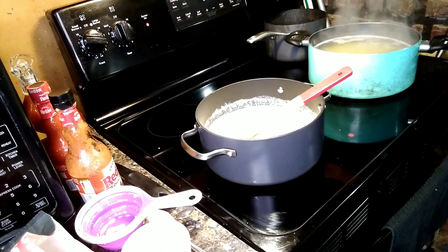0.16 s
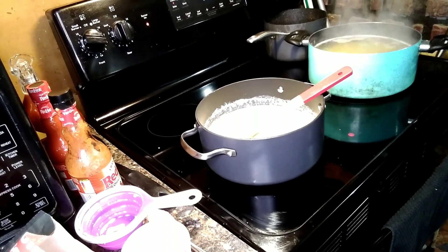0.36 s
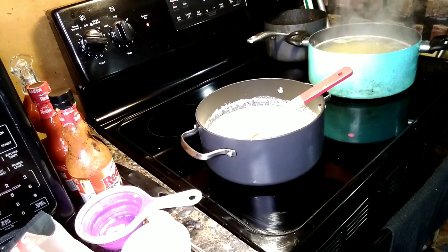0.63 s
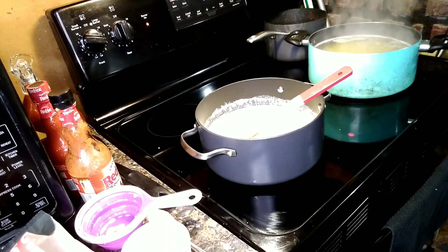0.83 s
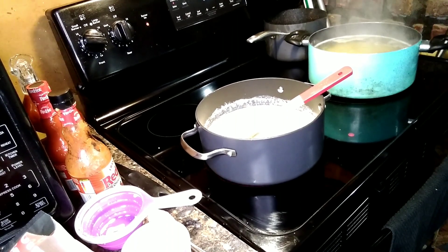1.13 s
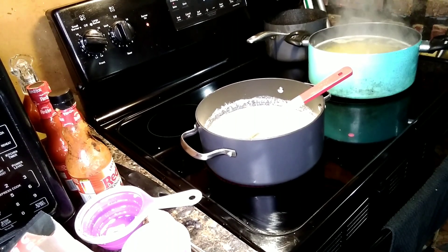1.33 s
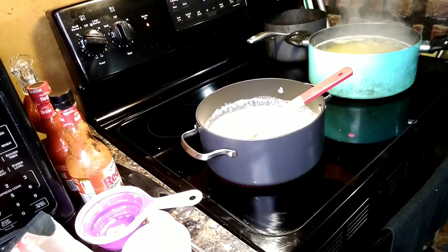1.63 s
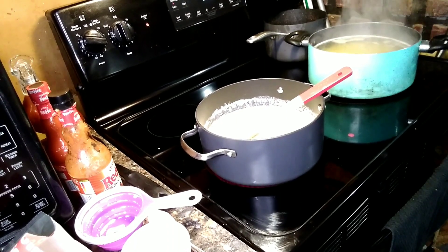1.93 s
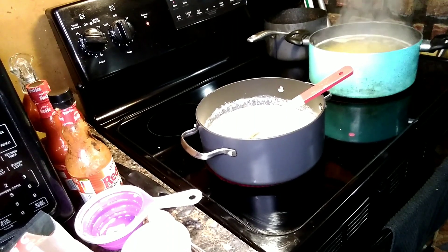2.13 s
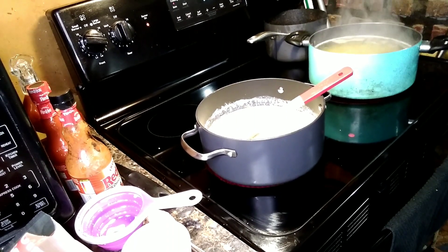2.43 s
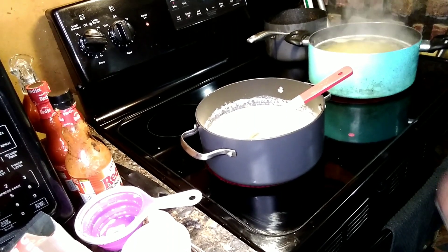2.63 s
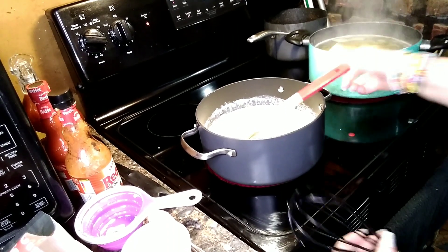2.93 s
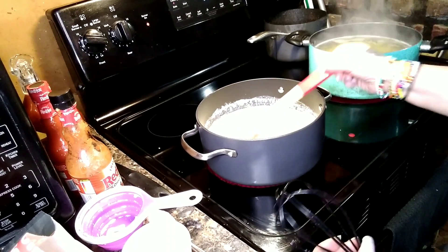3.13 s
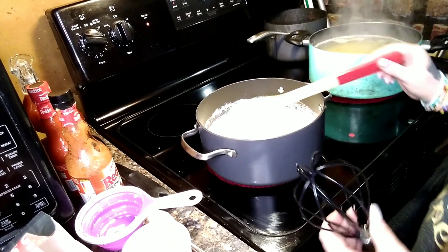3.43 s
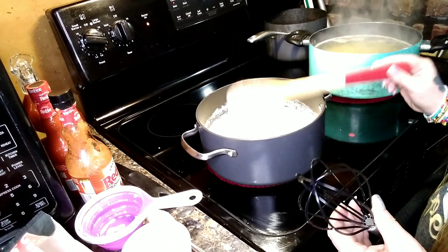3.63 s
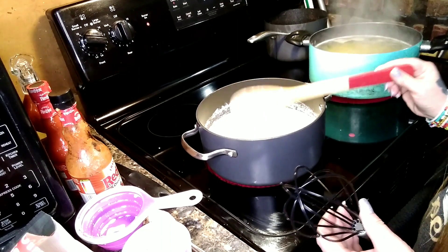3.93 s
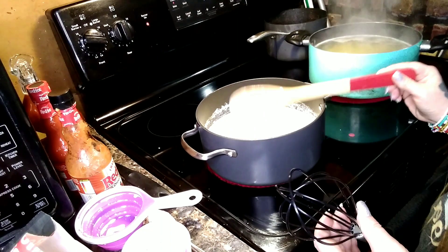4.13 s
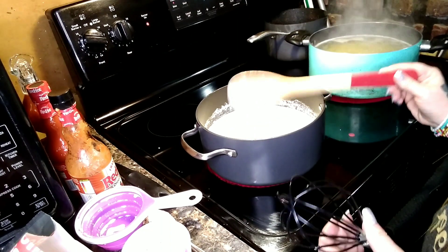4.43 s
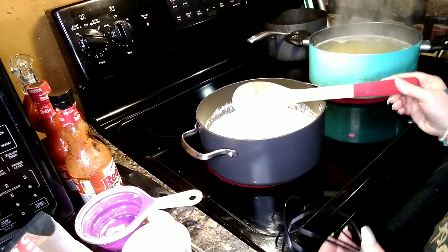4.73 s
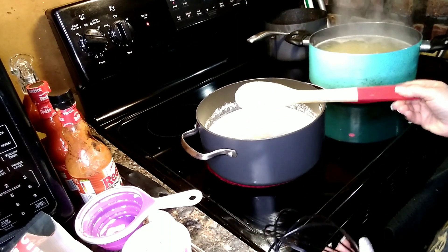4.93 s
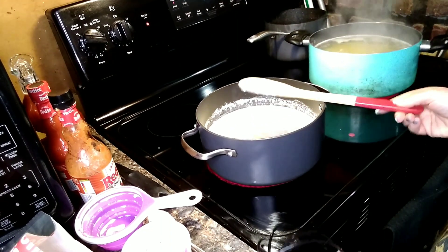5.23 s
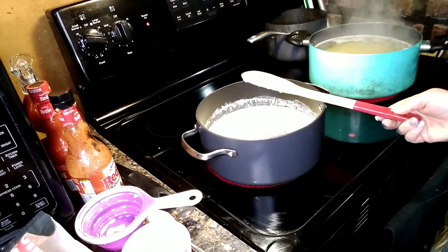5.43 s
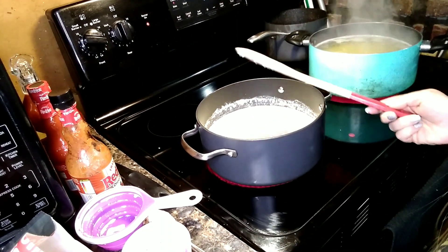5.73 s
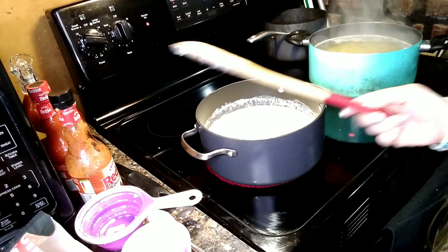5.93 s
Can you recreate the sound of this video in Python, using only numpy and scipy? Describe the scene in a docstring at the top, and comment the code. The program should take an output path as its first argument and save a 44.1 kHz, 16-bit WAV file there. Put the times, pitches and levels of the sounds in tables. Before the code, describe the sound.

A small, hard-surfaced, quiet kitchen is heard from close by in stereo, with a very faint simmering hiss, low appliance hum and thin whine throughout. During the first 1.3 seconds there are only soft rubs, tiny ticks and small knocks. At about 1.4 a utensil drawer shuts hard: a boxy wooden thud with loud, bright steel clicks, then irregular rattling bounces around 1.6 and 1.75, dwindling by 2.1, with a brief juddering creak at 2.0. From 2.3 to 3.3 loose wires and beads jingle in light, high shakes about every 0.15 seconds, strongest near 2.9, with soft rustling. At 3.7 a wooden spatula begins tapping a full metal pot's rim: six firm blows about 0.2 seconds apart, ending at 4.7, each a woody crack and short, damped clank, the tone shifting slightly. A small knock and rub follow at 4.8, then near silence to about 6.

```python
"""A wooden spatula taps six times on the rim of a full metal pot, close by: damped modes and a wooden crack.
Before that a drawer of utensils is shut and bounces (a struck box, rattling noise, steel clicks),
and loose wires and beads jingle as hands move (chattering noise through bright resonances).
Knocks, a creak and rubbing are shaped noise; simmer noise, a low hum and a thin whine fill the gaps.
The place is a quiet kitchen, a small hard room, heard by two close microphone ports."""
import sys
import numpy as np
from scipy import signal
from scipy.fft import rfft, irfft, next_fast_len
from scipy.io import wavfile
from scipy.ndimage import uniform_filter1d

SR = 44100
rng = np.random.default_rng(int(sys.argv[2]) if len(sys.argv) > 2 else 0)


def master(y):
    """Save y as 16-bit WAV."""
    cut = np.clip(np.atleast_2d(y).T, -1, 1)
    pcm = np.round(cut * 32767)  # scale
    wavfile.write(sys.argv[1], SR, pcm.astype(np.int16))


N = 267523

# spatula taps: (start_s, level_db, contact along the handle 0-1, spatula turned onto its edge 0-1)
TAPS = [(3.7193, -22, 0, 0.18), (3.914, -23.5, 0.28, 0.05), (4.11, -22.5, 0.54, 0.1),
        (4.305, -20, 0.99, 0.14), (4.515, -23, 0.79, 0.72), (4.714, -21, 0.31, 0.7)]
# pitches of the pot and spatula modes: (pitch_hz)
POT_HZ = [62, 124, 170, 225, 335, 362, 408, 441, 505, 565, 645, 770, 1175, 1217, 1265, 1360, 1416, 1495,
          1631, 1782, 1872, 1938, 2191, 2444, 2568, 2896, 3252, 3967, 4910, 5200]
# the same modes in order: (level_db, t60_s when ringing freely)
POT_MODES = [(-18, 0.107), (-15.5, 0.22), (-7, 0.17), (-8, 0.25), (-18.5, 0.24), (-3.5, 0.075),
             (-2.5, 0.19), (-5, 0.046), (-17.5, 0.35), (-14.5, 0.16), (-21, 0.3), (-23, 0.23), (8.5, 0.057),
             (4, 0.11), (2.5, .15), (4, 0.15), (-12, 0.16), (2, 0.19), (6, 0.091), (12, 0.14), (3, 0.19),
             (7, 0.12), (-8, 0.24), (5, 0.055), (-4, 0.13), (-19, 0.17), (0.5, 0.081), (-20, 0.082),
             (-31, 0.19), (-12, 0.035)]
# upper groups of modes begin above these: (pitch_hz)
GROUP_STARTS_HZ = [900, 1300, 1450, 1700, 1820, 2000]
# how a tap weights each upper group: (level_db at the handle's start, db gained along it, db gained by turning)
GROUP_WEIGHTS = [(-12.5, 2.5, -12), (-8.5, -19, -5), (-38, 23.5, 6), (-13.5, -10, -8), (-30, 5, 17),
                 (-37.5, 27, 1.5)]
# how a tap weights the crack: (level_db at the handle's start, db gained along it, db gained by turning)
CRACK_WEIGHT = (-25.5, 9.24, -1.7)
# relative spectrum of wood on steel: (frequency_hz, level_db per Hz)
CRACK = [(350, -38), (600, -19), (1000, -9.5), (1250, -7), (1900, -2.5), (2200, -10), (3300, -15.5),
         (3800, -24.5), (5300, -17.5), (6500, -26), (10000, -31.5), (16000, -63)]


def spatula_taps():
    """Each blow rings the pot's modes; where it lands weights them; a crack starts it."""
    out, t = np.zeros((2, N)), np.arange(SR // 2) / SR
    for start, level_db, along, turned in TAPS:
        group_db = [0] + [base + along * slid + turned * edge for base, slid, edge in GROUP_WEIGHTS]
        crack_db = np.dot(CRACK_WEIGHT, [1, along, turned])
        ring = 0
        for k, (hz, (mode_db, free_t60)) in enumerate(zip(POT_HZ, POT_MODES)):
            gain = amp(mode_db + group_db[np.searchsorted(GROUP_STARTS_HZ, hz)])
            t60 = 0.94 * min(free_t60, 0.22)  # a share of the free ring time, which is capped
            ring = ring + gain * pot_mode(t, k, hz, t60)
        crack_fall = amp(14.5) * dying(t, 0.039, 0.00025) + amp(-2.0) * dying(t, 0.39, 0.0011)
        crack = spread(CRACK, len(t), 0.66) * crack_fall
        settling = amp(-900.0 * t ** 2)  # the sauce and the hob damp the ring more and more
        tap = amp(level_db) * (ring + amp(crack_db) * crack) * settling
        add(out, start, heard(tap, lag_s=-0.0002, pan_db=-0.75, room_db=-7.0))
    return out


def pot_mode(t, k, hz, t60):
    """One mode swells within a cycle or so; the body's low modes start together, just after the rim's."""
    low = hz < 900
    t = np.maximum(t - 0.0012 * low, 0)
    sign = 1 if low else (-1) ** k
    return sign * dying(t, t60, 0.5 / hz) * np.sin(2 * np.pi * hz * t)


# drawer bounces: (start_s, level_db, rattle level_db re the box)
THUDS = [(1.389, -23.5, 9.5), (1.404, -22.5, -4), (1.425, -27, -4.5), (1.449, -25.5, -3),
         (1.499, -38.5, -4), (1.612, -29.5, 1.5), (1.661, -44, -0.5), (1.756, -34, -6.5), (1.811, -43, -26),
         (1.856, -44, -18), (1.933, -42, -28), (1.996, -46, -31), (2.09, -58.5, -29), (2.148, -66.5, -22.5)]
# modes of the wooden box: (pitch_hz, width_hz, level_db before the slope)
CABINET = [(54.5, 45, -7), (104, 35, 1), (157, 46, -1.5), (221.3, 35, -2), (273, 15, -4.5),
           (363.6, 31, 1.5), (552.5, 59, 1), (692.7, 23, -5.5), (759, 38, 0.5), (830, 220, -6.5),
           (1300, 56, -8)]
# relative spectrum of utensils shaken in the drawer: (frequency_hz, level_db per Hz)
RATTLE = [(290, -31.5), (500, 1), (631, -10.5), (678, -6.5), (960, -5), (1510, -10.5), (2460, -11),
          (3440, -13.5), (5970, -18), (9630, -15.5), (16000, -41)]


def drawer():
    """Each bounce shakes the wooden box and the utensils that lie in it."""
    out, t = np.zeros((2, N)), np.arange(SR // 2) / SR
    soft_to_hard_db = [-42.5, -23]
    for start, level_db, rattle_db in THUDS:
        slope_db = np.interp(level_db, soft_to_hard_db, [-5.0, -1.8])  # dB per octave over the box modes
        t60 = np.interp(level_db, soft_to_hard_db, [0.17, 0.28])
        blow = 15.0 * np.exp(-t / 0.00011)  # one short push, then smaller jolts
        push = blow + rng.standard_normal(len(t)) * dying(t, t60, 0.0019)
        box = 0
        for k, (hz, width, mode_db) in enumerate(CABINET):
            gain = (-1) ** k * amp(mode_db + slope_db * np.log2(hz / 100))
            box = box + gain * resonate(push, hz, width) / np.sqrt(width)
        box /= np.sqrt(np.mean(box[:1300] ** 2))  # rms 1 over the first 30 ms
        grain = graininess(len(t), 60, 3.3)  # many small knocks
        rattle = spread(RATTLE, len(t), 0.29) * grain * dying(t, 0.83 * t60, 0.007)
        thud = amp(level_db) * (box + amp(rattle_db) * rattle)
        add(out, start, heard(thud, lag_s=0.00016, pan_db=-1.3, room_db=-7.0))
    return out


# utensil clicks: (start_s, level_db, centre_hz, width_hz of each resonance pass)
CLICKS = [(1.3954, -10, 5450, 2200), (1.407, -5.5, 5700, 2470), (1.4178, -14.5, 5600, 2500),
          (1.519, -35, 6500, 5000), (1.5557, -22.5, 8200, 3560), (1.6182, -23.5, 4600, 3000),
          (1.63, -24, 4200, 3000), (1.6471, -23, 7730, 3500), (1.7633, -35, 4130, 3500),
          (1.775, -41, 3500, 4000)]


def utensil_clicks():
    """Steel on steel: a few cycles round a centre pitch, partly shared by the ports, then a faint rattle."""
    out, t = np.zeros((2, N)), np.arange(SR // 5) / SR
    for start, level_db, hz, width in CLICKS:
        burst = spread([(1, 0), (2, 0)], len(t), 0.55) * dying(t, 0.007, 0.0002)
        snap = np.array([steep(port, hz, width) for port in burst])
        snap /= np.sqrt(np.mean(snap[:, :70] ** 2))  # rms 1 over the first 1.6 ms
        ring = amp(-13.5) * spread(RATTLE, len(t), 0.17) * dying(t, 0.077, 0.0009)
        click = amp(level_db) * (snap + ring)
        add(out, start, heard(click, lag_s=0.00016, pan_db=0.0, room_db=-10.5))
    return out


# shakes of the wrist: (start_s, jingle level_db, centre_hz, rustle level_db, low rustle level_db,
# swing back level_db re the shake)
SHAKES = [(2.3097, -60.5, 8930, -68.5, -74, 4), (2.4708, -55.5, 8500, -62.5, -65.5, 2),
          (2.626, -50.5, 9580, -49.5, -62.5, -8.5), (2.7866, -42.5, 9400, -54.5, -64, -2),
          (2.9395, -35.5, 9340, -51.5, -56, 1), (3.0884, -44, 9080, -51.5, -62.5, -19),
          (3.2525, -63.5, 9000, -78, -86, -20.5)]
# bright resonances of the small pieces: (multiple of the centre, width_hz of each pass, level_db)
BEADS = [(1., 1000, 18), (.93, 170, 1.5), (1.1, 1600, 13), (1.3, 6400, 2), (1.5, 1900, -27)]
BACK_S, BACK_DB = 0.066, -20  # the swing back comes this late and jingles this much less


def jingles():
    """Small hard pieces chatter in bright, wide resonances, with a duller band below."""
    out, t = np.zeros((2, N)), np.arange(SR // 2) / SR
    swings = [row[:3] for row in SHAKES]
    swings += [(s + BACK_S, db + BACK_DB + back_db, hz) for s, db, hz, _, _, back_db in SHAKES]
    for start, level_db, hz in swings:
        t60 = 0.1 + 0.0025 * (-33 - level_db)  # fainter jingles chatter longer
        chatter = rng.standard_normal(len(t)) * graininess(len(t), 90, 3.0)
        bright = evened(sum(amp(d) * steep(chatter, hz * k, w) / np.sqrt(w) for k, w, d in BEADS))
        dull = evened(steep(chatter, 6060.0, 2000.0)) * dying(t, 1.15 * t60, 0.0038)
        fall = dying(t, t60, 0.0005) + amp(-1.0) * dying(t, 0.025, 0.0003)
        jingle = amp(level_db) * (bright * fall + amp(-8.5) * dull)
        add(out, start, heard(jingle, lag_s=-0.00022, pan_db=-4.5, room_db=-1.5))
    return out


# small knocks and ticks: (start_s, level_db, centre_hz, width_hz of each resonance pass, t60_s)
KNOCKS = [(0.202, -59, 200, 300, 0.16), (0.286, -49.5, 830, 895, 0.13), (0.287, -42, 5500, 4070, 0.012),
          (0.319, -41, 4900, 4040, 0.01), (.35, -56.5, 809, 30, 0.49), (.45, -60.5, 2390, 100, 0.13),
          (.65, -54.5, 3020, 900, 0.053), (.865, -54, 1920, 200, 0.039), (.864, -53, 9050, 9000, 0.05),
          (.95, -61.5, 225.3, 39.7, 1), (1.002, -52, 1700, 2940, 0.18), (1.043, -42.5, 1140, 2450, 0.091),
          (1.065, -46, 510, 400, 0.078), (1.351, -36, 530, 600, 0.31), (2.535, -58, 1920, 905, 0.074),
          (4.035, -54, 10500, 6200, 0.037), (4.258, -49, 150.5, 200, 0.15), (4.79, -45, 696, 910, 0.21)]


def knocks():
    """Things are touched or set down: a sudden noise round one centre; the higher, the less the ports share."""
    out, t = np.zeros((2, N)), np.arange(SR // 2) / SR
    # a dull knock comes 14 ms ahead of each shake, 1 dB above its rustle setting
    leads = [(s - 0.014, rustle_db + 1, 2560, 4000.0, 0.1) for s, _, _, rustle_db, _, _ in SHAKES]
    for start, level_db, hz, width, t60 in KNOCKS + leads:
        noise = spread([(1, 0), (2, 0.0053)], len(t), 1 - hz / 4400.0)
        knock = evened(np.array([steep(port, hz, width) for port in noise]))
        add(out, start, amp(level_db) * knock * dying(t, t60, 0.00039))
    return out


# the drawer runner judders: (start_s, end_s, slips per second, level_db, scrape level_db re the puffs)
CREAK = (2.005, 2.07, 191.5, -44., -4.)


def creak():
    """Quick, nearly even slips, each a bright puff, over a dull scrape."""
    start, end, slip_rate, level_db, scrape_db = CREAK
    t = np.arange(round((end - start) * SR) // 2 * 2) / SR
    waver = evened(uniform_filter1d(rng.standard_normal(len(t)), 300))
    slips = np.cumsum(slip_rate * (1 + 0.21 * waver)) / SR
    puffs = np.exp(-(slips % 1) / 0.15) * steep(rng.standard_normal(len(t)), 8600.0, 2800.0)
    scrape = amp(scrape_db) * evened(resonate(rng.standard_normal(len(t)), 605.0, 1500.0))
    judder = amp(-330.0 * t) * evened(puffs) + amp(-100.0 * t) * scrape
    out = np.zeros(N)
    add(out, start, amp(level_db) * judder * signal.windows.tukey(len(t), 0.2))
    return out


# rubbing strokes: (peak_s, rise_s, fall_s, low part level_db, high part level_db); rise and fall span 20 dB
STROKES = [(.01, .01, .25, -68, -64.5), (.3, .15, .4, -59.5, -68), (.29, .013, .09, -75, -54),
           (.504, .12, .07, -73.5, -62), (0.667, .09, .09, -67.5, -67), (.8, .03, 0.073, -75, -67),
           (.87, .09, 0.053, -78, -83), (1.16, .04, 0.059, -81, -65), (1.072, .12, 0.058, -52, -60),
           (1.29, .06, .02, -82.5, -66.5), (1.765, .006, 0.052, -40, -63.5),
           (1.86, .06, 0.11, -64.5, -59.5), (1.946, .04, .05, -55, -66.5), (4.81, .04, 0.064, -42, -49.5)]
# relative spectrum of the low part: (frequency_hz, level_db per Hz)
RUB_LOW = [(24, -45), (40, 0), (223, -4), (331, -5), (502, -3.5), (623, -10), (802, -7), (3000, -19.5),
           (3900, -49.5), (6600, -120)]
# relative spectrum of the high part: (frequency_hz, level_db per Hz)
RUB_HIGH = [(710, -33.5), (1200, -10.5), (1910, -12.5), (2320, -7.5), (2530, -8), (2710, -12.5),
            (10400, -8.5), (16000, -27)]
RUSTLE_RISE_S, RUSTLE_FALL_S = 0.009, 0.094
WRIST_DB, WRIST_FALL_S = -41.5, 0.35  # each tap also stirs the wrist: rustle re the blow


def rubs():
    """Hands, cloth and wood slide over surfaces: grainy noise under each stroke, shake and tap."""
    out = np.zeros((2, N))
    rise_s, fall_s = RUSTLE_RISE_S, RUSTLE_FALL_S
    shaken = [(s, rise_s, fall_s, low_db, db) for s, _, _, db, low_db, _ in SHAKES]
    shaken += [(s + BACK_S, rise_s, fall_s, low_db + back_db, db + back_db)
               for s, _, _, db, low_db, back_db in SHAKES]
    shaken += [(s + rise_s, rise_s, WRIST_FALL_S, db + WRIST_DB, db + WRIST_DB) for s, db, _, _ in TAPS]
    for peak, rise, fall, low_db, high_db in STROKES + shaken:
        start = max(peak - 2 * rise, 0)
        t = start - peak + np.arange(SR) / SR
        stroke = amp(-20 * np.where(t < 0, -t / rise, t / fall))
        grain = graininess(SR, 120, 3.5)
        low = amp(low_db) * coloured(RUB_LOW, SR)
        high = amp(high_db) * evened(grain * spread(RUB_HIGH, SR, 0.42))
        add(out, start, stroke * (low + high))
    return out


# relative spectrum of the simmering and appliance noise: (frequency_hz, level_db per Hz)
FLOOR = [(18, -54.5), (30, -22.5), (48, -11), (90, -14.5), (124, -3.5), (145, -25.5), (227, -13),
         (319, -17), (394, -14), (702, -13.5), (1280, -23.5), (1720, -22), (1860, -26.5), (10500, -32.5),
         (16000, -31)]
# likeness of that noise at the two ports: (frequency_hz, likeness -1 to 1)
LIKENESS = [(60, 1), (180, 1), (550, 0.58), (1650, -0.51), (4970, 0.24), (15000, 0.6)]
# phase between the ports: (frequency_hz, phase_radians)
PORT_PHASE = [(0, -6), (780, -6), (1640, 7), (8180, 20), (10300, 38.5), (16300, 40.5)]
# appliance tones: (pitch_hz, level_db rms before the waver)
HUM = [(118.4, -72.5), (236.9, -80), (1658, -81.5)]


def kitchen():
    """Simmering and appliance noise with drifting patches, plus steady tones that waver a little."""
    frames, hz = N // 256 + 5, np.fft.rfftfreq(1024, 1 / SR)
    a, b, c, d, patches = rng.standard_normal((frames, 513, 5)).T
    patches = evened(uniform_filter1d(uniform_filter1d(patches, 12, 0), 14, 1))
    same = read(LIKENESS, hz)[:, None]
    left, other = a + 1j * b, c + 1j * d
    right = same * left + np.sqrt(1 - same ** 2) * other
    right = right * np.exp(-1j * read(PORT_PHASE, hz))[:, None]
    z = np.array([left, right]) * amp(read(FLOOR, hz)[:, None] + 0.43 * patches)
    noise = evened(signal.istft(z, nperseg=1024, noverlap=768)[1][:, :N])
    out = amp(-64) * noise * amp([[-0.6], [0.6]])
    t = np.arange(N) / SR
    for pitch_hz, level_db in HUM:
        waver = evened(uniform_filter1d(rng.standard_normal(N), 8000))
        tone = np.sin(2 * np.pi * (pitch_hz * t + rng.random()))
        out = out + np.sqrt(2) * amp(level_db + 1.3 * waver) * tone
    return out


# decay of the small hard room: (frequency_hz, t60_s)
ROOM = [(150, 0.33), (600, 0.3), (2000, 0.2), (6000, 0.21), (14000, 0.079)]


def heard(x, lag_s, pan_db, room_db):
    """Direct sound reaches the left port lag_s after the right; the room answers each port and sound anew."""
    half = SR // 2
    echoes = rng.standard_normal((2, half)) * (np.arange(half) > 150)  # the room starts after 3.4 ms
    hz, t, z = signal.stft(echoes, SR, nperseg=256)
    z = z * amp(-60 * t / read(ROOM, hz)[:, None])
    alike = np.clip(1 - hz / 1800, 0, 1)[:, None]  # long waves are alike at both ports
    z[1] = alike * z[0] + np.sqrt(1 - alike ** 2) * z[1]
    tail = signal.istft(z, SR, nperseg=256)[1][:, :half] * np.hanning(half * 2)[half:]
    x = np.pad(x * np.ones((2, 1)), ((0, 0), (0, SR // 4)))
    length = x.shape[1]
    size = next_fast_len(length)
    f = np.fft.rfftfreq(size, 1 / SR)
    shift = np.exp(-1j * np.pi * f * lag_s * np.array([[1], [-1]]))  # half the lag each way
    direct = irfft(rfft(x, size) * shift, size)[:, :length]
    wet = signal.fftconvolve(x, tail / np.linalg.norm(tail[0]), axes=1)[:, :length]
    fade = np.minimum(np.arange(length)[::-1] / 4000, 1) ** 2
    return (direct + amp(room_db) * wet) * fade * amp([[pan_db / 2], [-pan_db / 2]])


def amp(db):
    """Decibels to gain."""
    return 10 ** (np.asarray(db) / 20)


def evened(x):
    """Scales to rms 1."""
    return x / np.sqrt(np.mean(x ** 2) + 1e-20)


def read(points, hz):
    """Reads a table on a log-frequency axis."""
    f, value = np.transpose(points)
    return np.interp(np.log(hz + 1), np.log(f + 1), value)


def add(mix, s, sound):
    """Mixes a sound in at s seconds."""
    part = mix[..., round(s * SR):][..., :sound.shape[-1]]
    part += sound[..., :part.shape[-1]]


def coloured(points, size):
    """Noise of rms 1 with the given spectrum."""
    spectrum = rfft(rng.standard_normal(size)) * amp(read(points, np.fft.rfftfreq(size, 1 / SR)))
    return evened(irfft(spectrum, size))


def spread(points, size, same):
    """Coloured noise for two ports that share only a part of it."""
    same = np.clip(same, 0, 1)
    shared = same * coloured(points, size)
    return shared + np.sqrt(1 - same ** 2) * np.array([coloured(points, size), coloured(points, size)])


def graininess(size, smooth, depth_db):
    """A random gain that swings by depth_db rms, smoothed over some samples."""
    return amp(depth_db * evened(uniform_filter1d(rng.standard_normal(size), smooth)))


def resonate(x, hz, width):
    """A resonance: shifts hz down to zero, smooths, and shifts back."""
    turn = np.exp(2j * np.pi * hz * np.arange(len(x)) / SR)
    r = np.exp(-np.pi * width / SR)
    return 2 * (turn * signal.lfilter([1 - r], [1, -r], x / turn)).real


def steep(x, hz, width):
    """A resonance applied twice."""
    return resonate(resonate(x, hz, width), hz, width)


def dying(t, t60, rise):
    """A soft start, then a fall of 60 dB in each t60."""
    return (1 - np.exp(-t / rise)) * amp(-60 * t / t60)


def scene():
    """The pot reaches the left port first, the drawer the right; hands and kitchen noise join them."""
    return (spatula_taps() + drawer() + utensil_clicks() + jingles() + kitchen()
            + heard(creak(), lag_s=0.00002, pan_db=-2.5, room_db=-3.0)[:, :N]
            + heard(rubs() + knocks(), lag_s=0.0001, pan_db=-1.5, room_db=-3.5)[:, :N])


# response of the microphone: (frequency_hz, level_db)
MICROPHONE = [(15, -28.5), (32, -14), (50, -4), (90, -2.5), (9000, -3.5), (12000, -3), (16000, -6.5)]


def record(dry):
    """The microphone loses deep bass and top treble and rounds off the highest peaks; then the band limit."""
    response = amp(read(MICROPHONE, np.fft.rfftfreq(N + 1, 1 / SR)))
    picked_up = irfft(rfft(dry, N + 1) * response, N + 1)[:, :N]
    rounded = 0.9 * np.tanh(picked_up / 0.9)
    band_limit = signal.firwin(511, 15900, window=("kaiser", 9), fs=SR)  # low-pass edge in Hz
    return signal.oaconvolve(rounded, band_limit[None], "same")


dry = scene()
out = record(dry)
master(out)
```